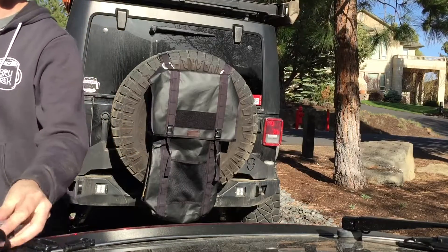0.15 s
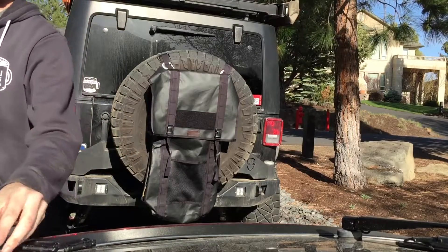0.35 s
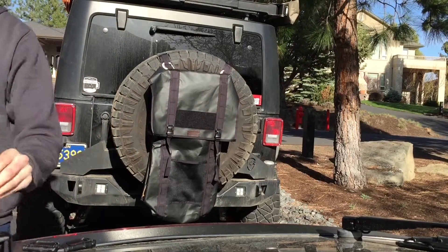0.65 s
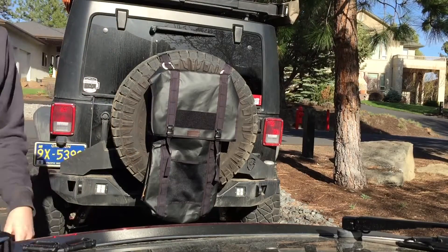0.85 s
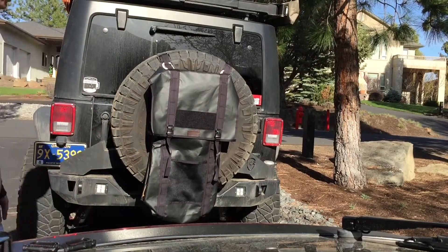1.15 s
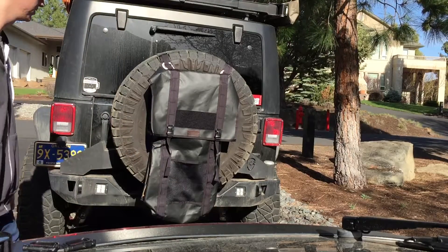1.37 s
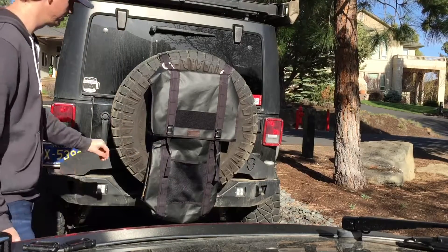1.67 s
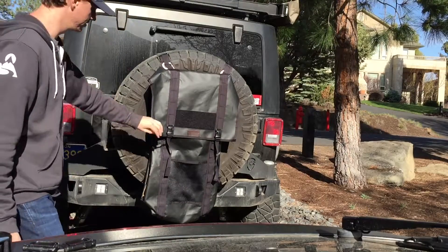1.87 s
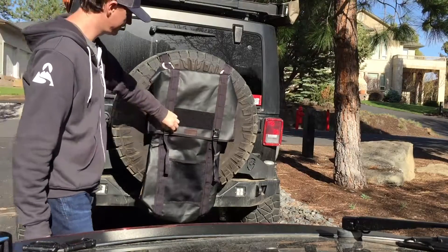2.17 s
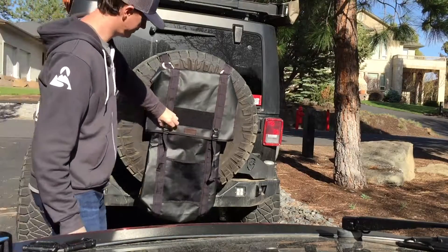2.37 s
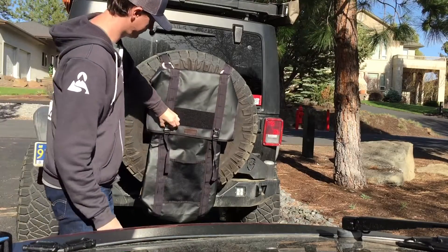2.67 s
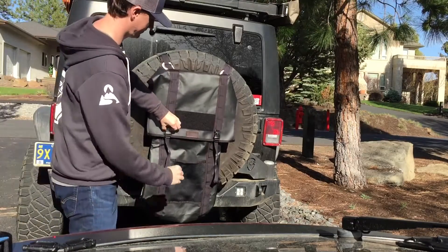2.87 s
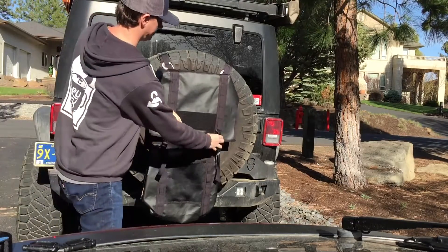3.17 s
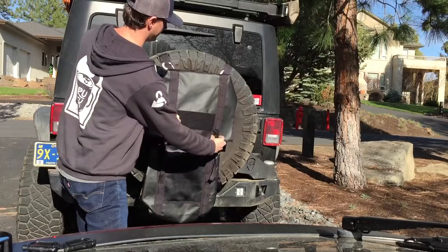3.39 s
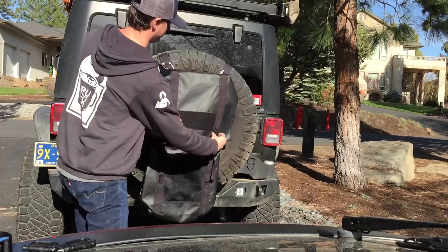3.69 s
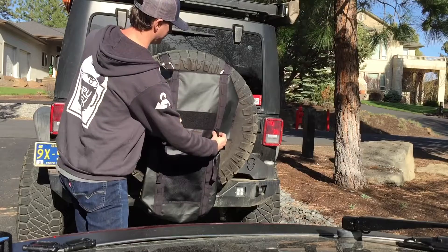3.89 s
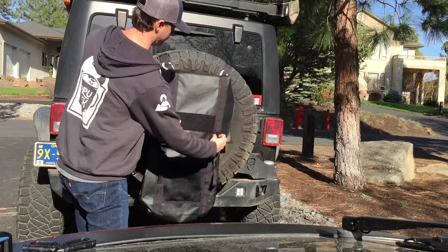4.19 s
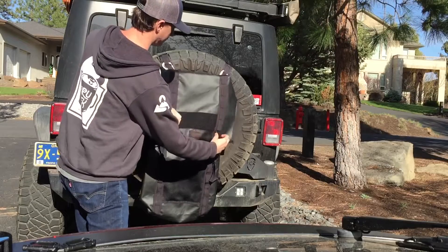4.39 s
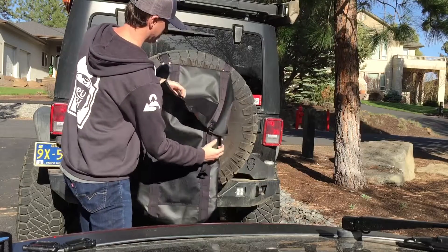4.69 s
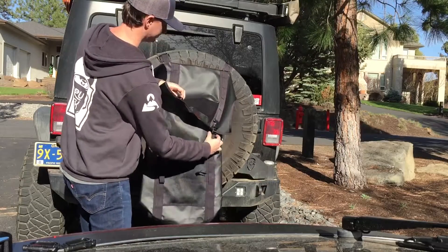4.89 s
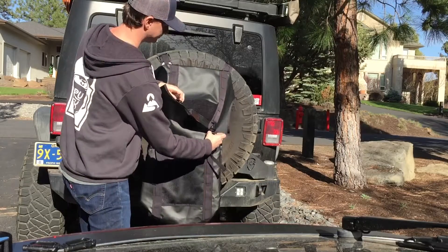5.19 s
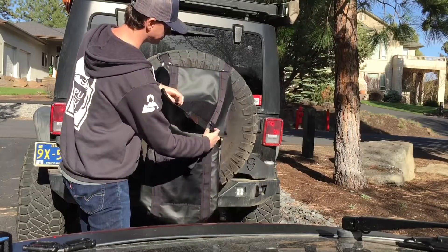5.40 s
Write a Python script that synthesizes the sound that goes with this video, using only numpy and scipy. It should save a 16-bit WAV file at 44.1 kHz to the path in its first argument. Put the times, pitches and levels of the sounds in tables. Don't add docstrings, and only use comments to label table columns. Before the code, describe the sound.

A plastic latch clicks, scrapes and slams with a hollow boom close by, then bag buckles snap and webbing rustles over a distant engine hum.

```python
import sys
import numpy as np
from scipy import signal
from scipy.fft import rfft, irfft, next_fast_len
from scipy.io import wavfile
from scipy.ndimage import map_coordinates

SR = 44100
rng = np.random.default_rng(int(sys.argv[2]) if len(sys.argv) > 2 else 0)


def invert_db(x):
    u = np.asarray(x, float) / 20
    return 10 ** u


def dump(signal):
    limited = np.clip(np.atleast_2d(signal).T, -1, 1)
    pcm = np.round(limited * 32767).astype(np.int16)
    wavfile.write(sys.argv[1], SR, pcm)


N = 244578


def unit(x):
    return x / np.sqrt(np.mean(x ** 2) + 1e-20)


def along(points, hz):
    f, v = np.transpose(points)
    return np.interp(np.log(hz + 1), np.log(f + 1), v)


def curves(rows, outside=None):
    s, *columns = np.transpose(rows)
    t = np.arange(N) / SR
    return [np.interp(t, s, column, outside, outside) for column in columns]


def wobble(rate, count=N):
    knots = rng.standard_normal(int(count * rate / SR) + 4)
    return map_coordinates(knots, [np.arange(count) * rate / SR])


def coloured(x, spectrum):
    m = next_fast_len(len(x) + 8192)
    gain = invert_db(along(spectrum, np.fft.rfftfreq(m, 1 / SR)))
    return unit(irfft(rfft(x, m) * gain, m)[:len(x)])


def grains(count, spiky_db, clump_db):
    size_db = spiky_db * wobble(900, count) + clump_db * wobble(60, count)
    return invert_db(size_db) * rng.standard_normal(count)


def fade(t60, rise, delay):
    t60, rise, delay = (np.reshape(np.abs(v), (-1, 1)) for v in (t60, rise, delay))
    t = np.maximum(np.arange(SR // 3) / SR - delay, 0)
    return invert_db(-60 * t / t60) * (1 - np.exp(-t / rise))


def ring(hz, db, t60, rise, delay=0., together=False):
    start = (not together) * rng.random((len(hz), 1))
    phase = 2 * np.pi * (np.outer(hz, np.arange(SR // 3) / SR) + start)
    return invert_db(db) @ (fade(t60, rise, delay) * np.sin(phase))


def burst(spectrum, t60s, lag):
    hz = np.geomspace(spectrum[0][0], spectrum[-1][0], num=12)
    bins = np.fft.rfftfreq(SR // 3, 1 / SR)
    place = np.interp(np.log(bins + 1), np.log(hz), np.arange(len(hz)))
    masks = np.maximum(1 - np.abs(place - np.arange(len(hz))[:, None]), 0)
    noise = coloured(rng.standard_normal(SR // 3), spectrum)
    bands = irfft(rfft(noise) * masks, SR // 3)
    late = lag / np.sqrt(hz)
    return np.sum(bands * fade(along(t60s, hz), late, late), axis=0)


def add(track, s, sound):
    i = round(s * SR)
    track[i:i + len(sound)] += sound[:N - i]


def air():
    # f/Hz, level/dB per Hz
    air_colour = [(35, -40), (60, -8.5), (96, -5), (147, -12), (442, -19), (486, -20), (675, -22.5),
                  (1610, -29.5), (2460, -30), (3180, -31.5), (4860, -33.5), (15000, -44.5), (16500, -55.5)]
    level_db = -63.5 + 0.42 * wobble(0.84) + .6 * wobble(7.7)
    return invert_db(level_db) * coloured(rng.standard_normal(N), air_colour)


def engine():
    # t/s, f/Hz
    revs = [(.8, 102.8), (1.9, 101.6), (3.2, 99.5), (3.5, 90.67), (3.6, 94.24), (4.1, 100.9), (4.4, 105.1),
            (4.7, 109), (5.3, 104.5)]
    # start t/s, length/s, tone level/dB, change of level/dB per s
    loads = [(1.375, 0.72, -56, 2.5), (2.124, 0.063, -48, -10), (2.297, 0.34, -58, -4),
             (2.648, 0.049, -52.5, -1), (2.731, 0.46, -57, -23), (3.525, 0.19, -54.5, -77),
             (3.789, 0.033, -53.5, -10), (3.908, 0.033, -64, -10), (4.14, 0.46, -55.5, -16),
             (4.654, .3, -68.5, 3), (5.2, 0.098, -65.5, 5), (5.366, 0.29, -63, 9.5)]
    # f/Hz, level/dB per Hz
    rumble_colour = [(20, -14.5), (38, -1), (52, 10.5), (75, -4), (130, -10.5), (200, -28.5)]
    attack_s, release_s = 0.032, 0.012
    hz, = curves(revs)
    t = np.arange(N) / SR
    level = invert_db(-79.5)
    for s, length, db, slope in loads:
        swell = np.clip((t - s) / attack_s, 0, 1)
        release = np.clip(1 - (t - s - length) / release_s, 0, 1)
        level = level + swell * release * invert_db(db + slope * np.clip(t - s, 0, length))
    phase = 2 * np.pi * np.cumsum(hz + 2.3 * wobble(8.7)) / SR
    tone = level * invert_db(1.6 * wobble(24)) * (np.sin(phase) + invert_db(-22.0) * np.sin(2 * phase))
    rumble = coloured(rng.standard_normal(N), rumble_colour)
    return tone + invert_db(-72 + 2.7 * wobble(4.4)) * rumble


def bird():
    # calls, each a path of t/s, f/Hz, level/dB
    calls = [
        [(2.51, 3040, -80), (2.545, 3125, -63), (2.59, 3160, -68), (2.645, 3180, -63), (2.675, 3160, -78),
         (2.72, 3150, -74), (2.77, 3165, -72), (2.79, 3165, -80), (2.86, 3160, -82)],
        [(2.94, 3880, -82), (2.96, 3790, -78), (3.0, 3390, -78), (3.035, 3030, -72), (3.058, 2950, -60),
         (3.078, 2925, -66), (3.1, 2920, -70)],
        [(3.44, 2580, -90), (3.5, 2535, -80), (3.58, 2560, -84)],
        [(3.57, 3385, -81), (3.61, 3230, -78), (3.645, 3180, -79), (3.68, 2700, -83), (3.73, 1900, -82)],
    ]
    out = np.zeros(N)
    for call in calls:
        hz = curves(call)[0]
        db = curves(call, -140)[1]
        phase = 2 * np.pi * np.cumsum(hz + 35 * wobble(150)) / SR
        out += invert_db(db + 3 * wobble(55)) * np.sin(phase)
    return out


def webbing():
    # middle t/s, half length/s, scrape level/dB, hiss level/dB, hiss f/Hz
    pulls = [(0.139, 0.028, -61.5, -80, 4480), (0.333, 0.01, -62, -56.5, 11500),
             (0.381, 0.011, -68, -44, 11500), (0.537, 0.023, -57.5, -67, 8450),
             (2.024, 0.033, -61, -68.5, 6500), (2.157, 0.022, -59, -69, 13100),
             (2.656, 0.032, -70, -72.5, 8480), (3.108, 0.0069, -44, -39.5, 8900),
             (3.1044, 0.0054, -70, -39, 2670), (3.131, 0.044, -60.5, -56, 6200),
             (3.184, 0.06, -63.5, -67, 5460), (4.293, .04, -69, -76, 6100),
             (4.317, 0.017, -51.5, -61, 7000), (4.344, 0.037, -83, -77, 9000),
             (4.55, 0.057, -65.5, -66.5, 7600), (4.668, 0.077, -62.5, -59.5, 8496),
             (4.705, 0.043, -63.5, -61.5, 9246), (4.683, .05, -70, -74, 14000), (4.69, .06, -68, -59, 3050),
             (4.7, 0.027, -80, -63, 3260), (4.533, .05, -80, -66.5, 2600), (5.168, 0.055, -69.5, -78, 9080),
             (5.289, 0.027, -70, -72, 13390)]
    # middle t/s, half length/s, scrape level/dB, scrape f/Hz
    scuffs = [(1.383, 0.046, -76, 1524), (1.524, 0.017, -70, 2820), (1.604, 0.066, -74, 1808),
              (2.027, .022, -54.5, 2000), (2.026, 0.019, -61.5, 950), (2.021, 0.027, -56, 3200),
              (2.192, .015, -58.5, 950), (2.06, 0.021, -62, 2800), (2.158, 0.017, -53.5, 1500),
              (2.204, 0.047, -62.5, 2940), (2.31, 0.024, -62, 3040), (2.657, 0.037, -69.5, 1484),
              (2.789, 0.056, -67.5, 1399), (3.303, 0.047, -65, 2800), (4.621, 0.066, -69, 2200),
              (4.689, 0.043, -60.5, 2940), (4.735, .02, -65, 2010), (4.885, 0.052, -66, 1400),
              (4.885, 0.042, -64.5, 2600), (5.097, 0.028, -68, 2586), (5.249, 0.045, -62.5, 2920),
              (5.286, 0.022, -61, 1475), (5.338, 0.025, -75, 1504)]
    # multiple of scrape f, level/dB per Hz
    weave_colour = [(.1, -39.5), (.25, -14), (.45, -7), (.85, -8.5), (1.01, -2), (1.15, -7), (1.8, -14),
                    (2.6, -27.5), (4.1, -60.5)]
    # multiple of scrape f, level/dB per Hz
    scuff_colour = [(.2, -45), (.55, -13), (.8, -7.5), (1.01, -2), (1.2, -9), (1.6, -14), (2.6, -31),
                    (4.1, -60)]
    # multiple of hiss f, level/dB per Hz
    hiss_colour = [(.3, -25), (.6, -9), (.85, -4), (1.01, 0), (1.25, -7), (1.6, -15), (2.4, -30),
                   (3.5, -60)]
    weave_hz = 2700
    scuff_hiss_db, scuff_hiss_hz = -16.5, 6500
    out = np.zeros(N)
    u = np.arange(-SR // 8, SR // 8) / SR
    strokes = [(weave_colour, s, half, db, weave_hz, hiss_db, hz) for s, half, db, hiss_db, hz in pulls]
    strokes += [(scuff_colour, s, half, db, hz, db + scuff_hiss_db, scuff_hiss_hz)
                for s, half, db, hz in scuffs]
    for colour, s, half, scrape_db, hz, hiss_db, hiss_hz in strokes:
        scrape_spectrum = [(k * hz, db) for k, db in colour]
        hiss_spectrum = [(k * hiss_hz, db) for k, db in hiss_colour]
        scrape = coloured(grains(len(u), spiky_db=4.0, clump_db=1.83), scrape_spectrum)
        hiss = coloured(grains(len(u), spiky_db=3.0, clump_db=2.0), hiss_spectrum)
        stroke = np.exp(-2 * (u / half) ** 2)
        add(out, s + u[0], stroke * (invert_db(scrape_db) * scrape + invert_db(hiss_db) * hiss))
    return out


def bag():
    # t/s, peak level/dB, f/Hz, t60/s
    thumps = [(2.159, -35.5, 331, 0.033), (2.188, -45.5, 257, 0.047), (3.108, -37.5, 330.1, 0.053),
              (3.133, -41.5, 323, 0.072), (3.188, -35.5, 493, 0.025), (3.234, -47.5, 490, 0.036),
              (4.677, -51, 297, 0.066), (3.302, -54.5, 297.9, 0.061), (4.053, -52.5, 315, 0.054),
              (4.274, -55, 319, 0.05), (4.313, -36.5, 476, 0.028), (4.32, -39, 254, 0.065),
              (4.369, -50, 302, 0.051), (4.546, -45, 308, 0.046), (4.553, -56, 328, .04),
              (4.585, -46, 248, 0.047), (4.731, -47, 300, 0.054), (4.6, -45.5, 300, 0.081),
              (4.626, -39, 312, 0.067), (4.634, -30.5, 325, 0.026), (4.739, -43.5, 342, 0.044),
              (4.884, -45, 319, 0.057), (4.951, -48.5, 648, 0.039), (5.012, -53, 228.4, 0.059),
              (5.279, -51, 426, 0.057), (5.344, -51.5, 253.6, 0.068)]
    # t/s, peak level/dB, f/Hz, t60/s
    low_thumps = [(.44, -49.5, 197, 0.13), (0.474, -50.5, 170, .1), (.712, -50, 170, .08),
                  (.69, -45.5, 207, 0.081), (.74, -54, 199.4, .08), (4.876, -49, 520, 0.036),
                  (4.912, -51, 500, .04), (2.157, -43.5, 155, 0.061), (3.125, -42.5, 149, 0.054),
                  (3.128, -50.5, 101, 0.11), (4.6, -57.5, 56.5, 0.74)]
    out = np.zeros(N)
    ratios = np.array([.72, 1.01, 1.45, 2.1, 3.1])
    mode_db = np.array([-6.0, 5, -7.5, -14.0, -14.5])
    for s, db, hz, t60 in thumps + low_thumps:
        add(out, s - .0015, ring(hz * ratios, db + mode_db, t60, 0.0027))
    return out


def buckles():
    # t/s, peak level/dB, prong f/Hz, crack level/dB above peak, shell f/Hz
    snaps = [
        (2.1505, -45, 1440, 0, 2960),
        (2.154, -41, 1510, 0, 2360),
        (3.103, -40.5, 2415, 5, 11900),
        (3.1071, -26, 2960, -1, 8760),
        (3.114, -44, 3060, 5.5, 6140),
        (3.2325, -16, 3210, -13, 6640),
        (3.2465, -28.5, 3350, -9.5, 6560),
        (4.317, -41.5, 973, 3, 10050),
        (4.326, -54, 1380, 1, 8650),
        (4.583, -53, 2550, 5, 5740),
    ]
    # t/s, peak level/dB, prong f/Hz, shell f/Hz
    taps = [(0.891, -61, 2333, 2490), (2.032, -52, 2076, 3000), (2.1502, -41.5, 3314, 13000),
            (2.156, -38, 2940, 12960), (3.136, -46.5, 807, 10000), (4.276, -51, 1010, 2520),
            (4.546, -53, 2406, 1600), (4.624, -39, 853, 1600), (4.635, -35, 870, 1500),
            (4.752, -57, 890, 1502), (4.874, -61, 1650, 2504), (4.887, -56, 1810, 5980),
            (4.953, -59, 1320, 6500), (5.089, -57, 2890, 5995), (5.281, -55, 2750, 12000)]
    # t/s, peak level/dB, f/Hz,
    # t60/s
    knocks = [
        (1.516, -61, 894, 0.048),
        (1.58, -64, 1355, .05),
        (1.604, -65, 1420, .03),
        (1.628, -53, 1290, 0.044),
        (1.639, -58, 1900, 0.014),
        (1.632, -61, 599, 0.042),
        (3.256, -51, 3300, 0.029),
        (3.274, -52, 3400, 0.024),
    ]
    # multiple of shell f, level/dB per Hz
    shell_colour = [(.12, -5), (.5, 3.5), (.85, -4), (1.01, 7.5), (1.2, -8), (1.7, -16), (2.6, -31.5),
                    (4.1, -43)]
    tap_crack_db = -14.5
    snap_t60_s, grip_per_db, loose_db = 0.024, 0.21, -61
    ratios = np.array([.8, .98, 1.03, 1.2])
    prong_db = np.array([-6.0, 2.5, -6.0, -11.0])
    out = np.zeros(N)
    hits = snaps + [(s, db, hz, tap_crack_db, shell_hz) for s, db, hz, shell_hz in taps]
    for s, db, hz, crack_db, shell_hz in hits:
        t60 = snap_t60_s * invert_db(-grip_per_db * (db - loose_db))
        prong = ring(hz * ratios, prong_db, t60, 0.0013, together=True)
        shell_spectrum = [(k * shell_hz, level) for k, level in shell_colour]
        shell = burst(shell_spectrum, [(1000, 0.79 * t60)], lag=0.031)
        add(out, s - .0003, invert_db(db + 4.5) * (prong + invert_db(crack_db + 1.5) * shell))
    for s, db, hz, t60 in knocks:
        add(out, s, ring(np.array([hz]), np.array([db + 6.5]), t60, .0025, together=True))
    return out


def latch_contacts():
    # t/s, tongue peak level/dB, tongue f/Hz, panel level/dB, crack level/dB
    contacts = [(0.2799, -30, 3720, -36.5, -41.5), (0.2983, -46, 3700, -45.5, -47.5),
                (0.32, -60, 3280, -41, -66), (0.334, -42, 4160, -35, -39), (0.345, -28, 4100, -38, -54),
                (0.3785, -27, 2900, -24, -28.5), (.386, -33, 2480, -32, -44), (.394, -38.5, 2500, -36, -48),
                (0.415, -41.5, 2600, -37, -46), (.428, -41.5, 2502, -42.5, -54.5),
                (0.5461, -16.5, 3840, -17.5, -33.5), (0.578, -36, 3940, -41.5, -45.5),
                (.589, -2.5, 3815, -9.5, -15.5), (0.612, -34, 3950, -35.5, -49),
                (0.6289, -9.5, 3960, -18, -22.5), (.655, -41, 4070, -56, -52.5),
                (0.6932, -46.5, 3740, -55.5, -56)]
    # f/Hz, level/dB, t60/s
    panel_modes = [(118, -10.5, 0.16), (227.9, -11, 0.088), (442, -7, .05), (1070.3, -6, 0.064),
                   (1231, -3.5, 0.12), (1650, -12, 0.067), (356, -2, 0.079), (578, 7, 0.054),
                   (807, -12.5, 0.14), (957, -2.5, 0.061), (1137, -3.5, 0.082), (1387, -10, 0.049),
                   (1900, -2.5, 0.028), (2335, -13.5, 0.061)]
    # f/Hz, level/dB per Hz
    small_modes = [(35, -36.5), (60, -12), (168, -5.5), (556, -5.5), (865, -9.5), (1200, -1.5),
                   (1930, -8.5), (2860, -16.5), (4500, -21.5), (8000, -45.5)]
    # f/Hz, t60/s
    small_t60 = [(60, 0.12), (250, 0.15), (1000, 0.067), (3000, .05)]
    # f/Hz, level/dB per Hz
    crack_colour = [(800, -25.5), (2000, 1), (4500, 0.5), (6500, -4), (8500, -9)]
    # f/Hz, t60/s
    crack_t60 = [(2000, .035), (6000, 0.028), (14000, 0.011)]
    hard_from_db, dull_per_db, dullest_db = -14.5, 1, -11.5
    ratios = np.array([.84, .975, 1.01, 1.11])
    mode_db = np.array([-9, 3.5, 2.0, -5])
    out = np.zeros(N)
    big_hz, big_db, big_t60 = np.transpose(panel_modes)
    for s, tongue_db, tongue_hz, panel_db, crack_db in contacts:
        hard_db = max(dull_per_db * (crack_db - hard_from_db), dullest_db)
        crack_spectrum = crack_colour + [(11000, 1.6 * hard_db - 10.5), (16000, 2.6 * hard_db - 16.5)]
        varied_db = big_db - 8 + rng.normal(0, 2, size=len(panel_modes))
        big = ring(big_hz, varied_db, big_t60, 0.00031, .07 / np.sqrt(big_hz))
        tongue = ring(tongue_hz * ratios, mode_db, .012, .0015, 0.00046, together=True)
        panel = big + invert_db(-1.0) * burst(small_modes, small_t60, lag=0.048)
        crack = burst(crack_spectrum, crack_t60, lag=0.014)
        add(out, s + .0005, invert_db(tongue_db) * tongue + invert_db(panel_db) * panel + invert_db(crack_db) * crack)
    return out


def latch_spring():
    # t/s, level/dB
    zings = [
        (.336, -49),
        (0.38, -35),
        (.398, -64.5),
        (.5905, -50),
    ]
    # f/Hz, level/dB per Hz
    zing_colour = [(10500, -30), (11600, -2.5), (12000, -11.5), (12800, 0), (13800, -30)]
    out = np.zeros(N)
    for s, db in zings:
        add(out, s, invert_db(db) * burst(zing_colour, [(12000, 0.035)], lag=.2))
    return out


def panel_booms():
    # f/Hz, level/dB, t60/s
    slam_modes = [(82, -30, 0.24), (117, -29, 0.27), (170, -15, 0.043), (222, -25, .2), (376, -12.5, 0.032),
                  (520, -14, .05), (558, -14, 0.06), (783.3, -19.5, 0.045), (403, -16, .04),
                  (1910, -9, 0.024), (2130, -16, .03)]
    out = np.zeros(N)
    hand_hz = np.array([160, 235, 1360, 1180])
    hand_db = np.array([-34, -28.5, -33, -39.5])
    hand_t60 = np.array([.055, .05, 0.045, .09])
    add(out, .283, ring(hand_hz, hand_db, hand_t60, 0.0016))
    add(out, .592, ring(*np.transpose(slam_modes), 0.00093))
    return out


def latch_drag():
    # t/s, level/dB
    drag = [(.3, -69), (.322, -38), (.35, -34), (.365, -36.5), (.376, -39), (.4, -37), (.43, -46),
            (.46, -57), (.51, -72)]
    # f/Hz, level/dB, t60/s
    held_modes = [(170, -10, .1), (312, -4, .05), (410, -9.5, .06), (598, 0, .09), (786, -8.5, 0.077),
                  (1055, -9, 0.092), (1217, -5, .08), (1340.2, -9.5, .08), (1650, -11, 0.062),
                  (1860, -17, 0.089), (2150, -19, .08), (2480, -15, 0.097)]
    # f/Hz, level/dB per Hz
    small_modes = [(35, -36.5), (60, -12), (168, -5.5), (556, -5.5), (865, -9.5), (1200, -1.5),
                   (1930, -8.5), (2860, -16.5), (4500, -21.5), (8000, -45.5)]
    drag_db, = curves(drag, -120)
    rub = grains(N, spiky_db=4.0, clump_db=1.24)
    woody = unit(signal.fftconvolve(rub, ring(*np.transpose(held_modes), 0.0011))[:N])
    return invert_db(drag_db) * (invert_db(-1.0) * woody + invert_db(-10) * coloured(rub, small_modes))


def latch():
    return latch_contacts() + latch_spring() + panel_booms() + latch_drag()


def yard(x):
    # f/Hz, t60/s
    echo_t60 = [(200, 0.38), (3000, 0.16), (12000, 0.095)]
    hz, t, z = signal.stft(rng.standard_normal(SR // 2), SR, nperseg=256)
    dying = invert_db(-60 * t / along(echo_t60, hz)[:, None])
    tail = signal.istft(z * dying, SR, nperseg=256)[1]
    late = np.pad(x, (200, 0))
    return signal.fftconvolve(late, tail / np.linalg.norm(tail))[:N]


def scene():
    song = bird()
    far = webbing() + bag() + buckles()
    near = latch()
    direct = invert_db(-4) * song
    wet = yard(invert_db(-27) * near + invert_db(-13.5) * far + invert_db(-3) * song)
    return (air() + engine() + direct + far + near + wet)[None]


def roll_off(x):
    return signal.sosfilt(signal.butter(12, 16800, fs=SR, output="sos"), x)


def record(dry):
    # f/Hz, width/Hz, share lost
    port_dips = [(4800, 740, 0.38), (7600, 730, 0.34), (10440, 710, 0.49)]
    for hz, width_hz, share in port_dips:
        dry = dry - share * signal.lfilter(*signal.iirpeak(hz, hz / width_hz, SR), dry)
    soft = signal.sosfilt(signal.butter(16, 15700, fs=SR, output="sos"), dry)
    soft = signal.sosfilt(signal.butter(2, 45, "high", fs=SR, output="sos"), soft)
    return roll_off(soft)


dry = scene()
out = record(dry)
dump(out)
```